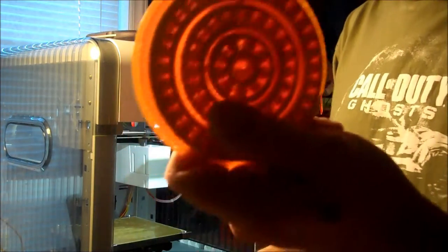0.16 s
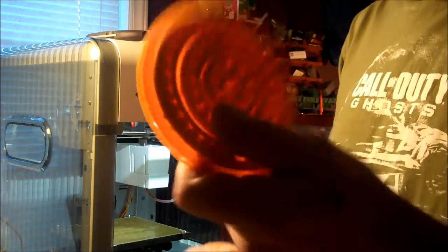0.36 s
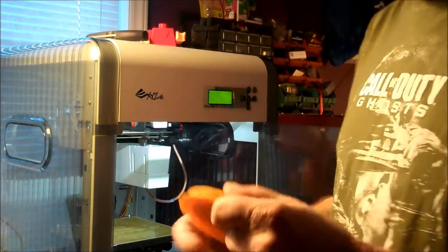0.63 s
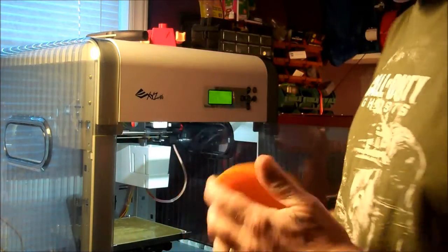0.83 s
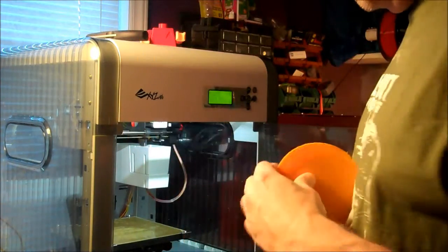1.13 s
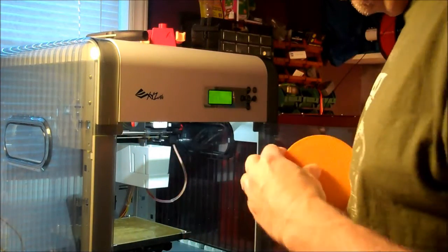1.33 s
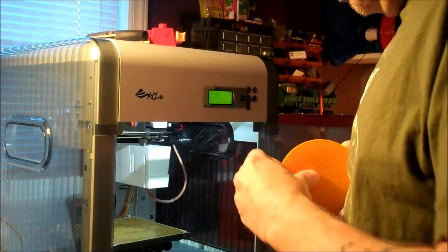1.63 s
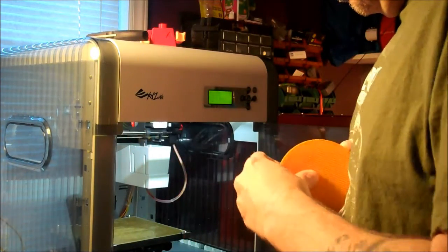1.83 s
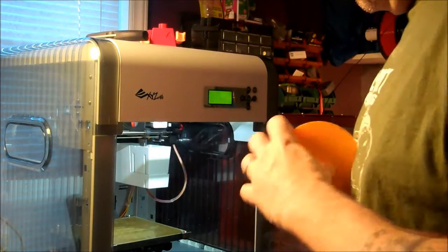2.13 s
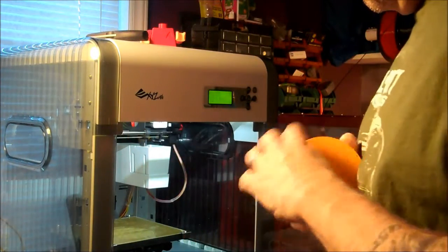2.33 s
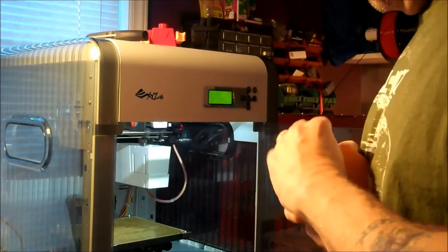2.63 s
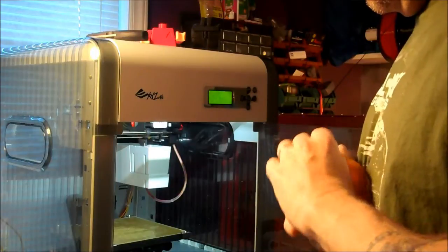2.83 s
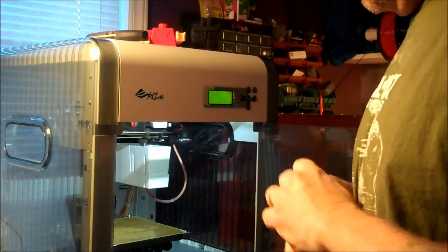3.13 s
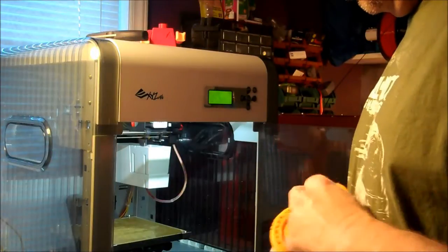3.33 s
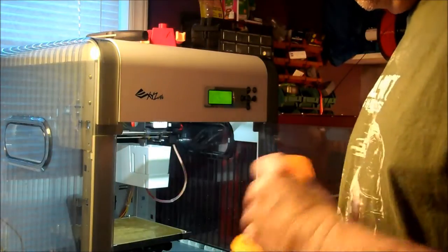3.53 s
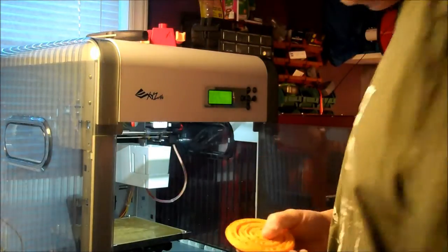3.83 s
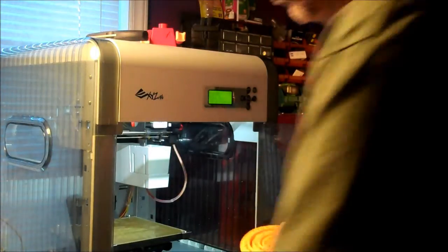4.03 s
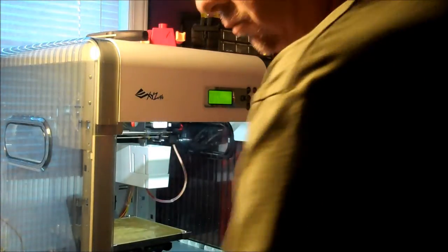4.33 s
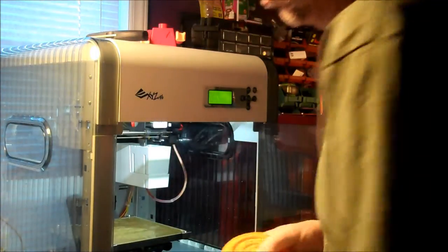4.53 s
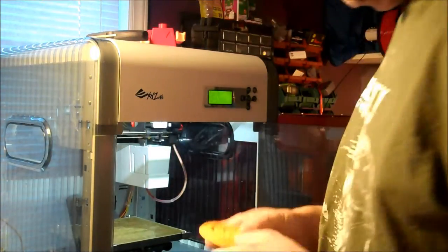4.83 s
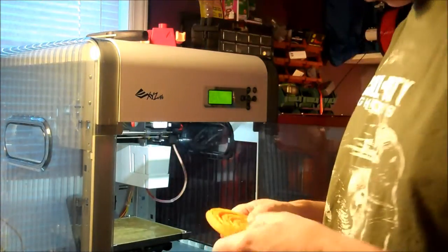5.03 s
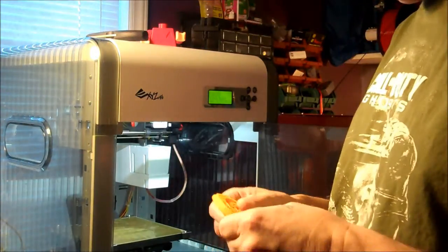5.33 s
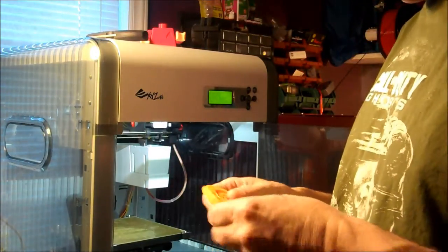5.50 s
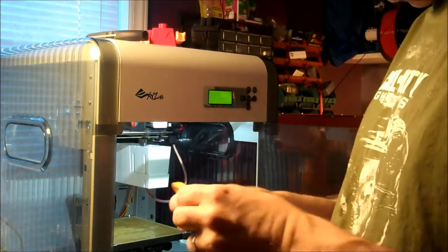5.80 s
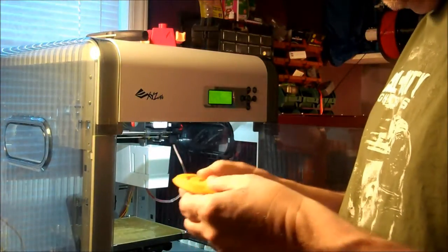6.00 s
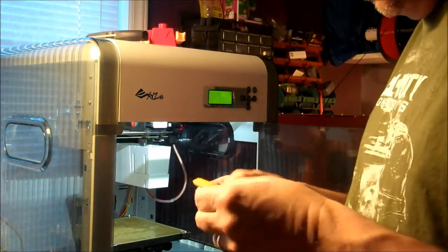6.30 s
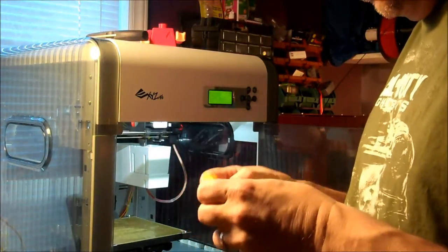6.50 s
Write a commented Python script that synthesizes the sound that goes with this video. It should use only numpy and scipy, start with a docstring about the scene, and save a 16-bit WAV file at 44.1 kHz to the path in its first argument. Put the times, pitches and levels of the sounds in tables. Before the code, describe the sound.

Over a faint machine fan, brittle plastic creaks and breaks with sharp, overloaded cracks, then a small piece clatters away and quiet handling resumes.

```python
"""In a small room, hands bend a hard, ribbed 3D-printed disc until it breaks, and a piece clatters into a bin.
Creaks, three tearing fractures and sharp cracks are clusters of random slips, heard directly and through
the disc's resonances; fingers rub and scrape, and low thumps are decaying low-passed noise.
A printer's fan sums unsteady sines over coloured noise. Bench and printer throw the handwork back as echoes,
scatter and a tail follow, and the loudest sounds overload the camera's microphones."""
import sys
import numpy as np
from scipy import signal
from scipy.fft import rfft, irfft, next_fast_len
from scipy.io import wavfile
from scipy.ndimage import map_coordinates

SR = 44100
rng = np.random.default_rng(int(sys.argv[2]) if len(sys.argv) > 2 else 0)


def output_pcm(signal):
    """Save a mono or channel-first signal as 16-bit PCM at the path in sys.argv[1].

    Samples are clipped to [-1, 1] before scaling.
    """
    pcm = np.clip(np.atleast_2d(signal).T, -1, 1) * 32767
    wavfile.write(sys.argv[1], SR, np.round(pcm).astype(np.int16))


N = 293692

# resonances of the plastic disc: centre [f/Hz], bandwidth [f/Hz], relative gain [level/dB]
DISC_MODES = [(536, 38, -8), (762, 140, 3), (1145, 120, 2.5), (1315, 233, 1), (1613, 130, 2.5),
              (1980, 570, 0), (2370, 63, -8.5), (2780, 22, -2), (3050, 130, 3.5), (3197, 160, 2)]


def amp(db):
    """Level: 20 dB is a factor of ten in amplitude."""
    return 10 ** (np.asarray(db) / 20)


def unit(x):
    """Normalisation to an rms value of 1."""
    return x / np.sqrt(np.mean(x ** 2) + 1e-20)


def along(points, hz):
    """Linear interpolation of (f/Hz, value) points over log frequency."""
    f, value = np.transpose(points)
    return np.interp(np.log(hz + 1), np.log(f + 1), value)


def wobble(rate):
    """Slow random modulation: a spline through Gaussian knots, rate of them a second."""
    knots = rng.standard_normal(int(N * rate / SR) + 4)
    return map_coordinates(knots, [np.arange(N) * rate / SR])


def filtered(x, response):
    """Linear filtering: the spectrum is multiplied by a complex frequency response."""
    size = x.shape[-1]
    padded = 2 * next_fast_len(size // 2 + 4096)
    spectrum = rfft(x, padded) * response(np.fft.rfftfreq(padded, 1 / SR))
    return irfft(spectrum, padded)[..., :size]


def colour(points):
    """Minimum phase: folding the cepstrum makes the gains of (f/Hz, level/dB) points causal."""
    def response(hz):
        cepstrum = irfft(np.log(amp(along(points, hz))))
        cepstrum[1:len(hz) - 1] *= 2
        cepstrum[len(hz):] = 0
        return np.exp(rfft(cepstrum))
    return response


def body(modes):
    """Modal superposition: damped resonators of alternating sign add up."""
    def response(f):
        total = 0
        for k, (centre, width, db) in enumerate(modes):
            damping = 1j * f * width
            total = total + (-1) ** k * amp(db) * damping / (centre ** 2 - f ** 2 + damping)
        return total
    return response


def grains(size, spread_db):
    """Stick-slip: tiny slips of very unequal strength, rms 1."""
    strength_db = spread_db * rng.standard_normal(size // 16 + 1)
    strength = np.repeat(amp(strength_db), 16)[:size]  # one strength for 16 samples
    return unit(rng.standard_normal(size) * strength)


def diffuse(size):
    """Partial coherence: stereo noise most alike near 700 Hz, less so below, nearly unrelated in the treble."""
    # likeness of left and right: f/Hz, correlation [0 to 1]
    likeness = [(60, .4), (200, 0.55), (700, 0.71), (1400, 0.57), (3000, 0.3), (7000, 0.22), (14000, 0.055)]

    def mid_side(hz):
        turn = np.arccos(np.clip(along(likeness, hz), -1, 1)) / 2
        return np.array([np.cos(turn), np.sin(turn)])
    mid, side = filtered(rng.standard_normal((2, size)), mid_side)
    return np.array([mid + side, mid - side])


def add(track, s, sound):
    """Superposition: mix a sound into the track from time s."""
    part = track[..., max(round(s * SR), 0):][..., :sound.shape[-1]]
    part += sound[..., :part.shape[-1]]


def room(x, near_db, far_db, near_t60=0.12):
    """Room impulse response: direct sound, bench and printer echoes, shelf scatter and reverberant tail."""
    # reverberation: f/Hz, decay by 60 dB [t/s]
    reverberation = [(150, 0.14), (500, 0.47), (1400, 0.71), (3000, 0.56), (6500, 0.54), (9000, 0.44),
                     (13000, 0.39)]
    # reflections off bench and printer: delay [t/s], left gain [factor], right gain [factor]
    reflections = [(.0022, 0.16, .12), (.0058, 0.46, 0.14), (0.0121, .14, .08)]
    size = SR // 2
    t = np.arange(size) / SR
    # the tail decays at its own rate in each frequency band
    hz, frame_t, bands = signal.stft(diffuse(size), SR, nperseg=256)
    decay = amp(-60 * frame_t / along(reverberation, hz)[:, None])
    tail = signal.istft(bands * decay, SR, nperseg=256)[1][:, :size]
    tail = unit(tail * (1 - np.exp(-t / .008)))
    scatter = unit(diffuse(size) * amp(-60 * t / near_t60) * (1 - np.exp(-t / 0.00043)))
    paths = (amp(near_db) * scatter + amp(far_db) * tail) / np.sqrt(size)
    paths[:, 0] += 1  # direct sound
    for delay, left, right in reflections:
        add(paths, delay, np.array([[left], [right]]))
    return signal.fftconvolve(x[None], paths, axes=1)


def burst(envelope, spectrum, modes, ring_db, centre_hz, spread_db, lead=0, breadth=0.98,
          ring_db_per_octave=25):
    """Excitation and resonance: slips, optionally led by a clean snap, heard directly and through modes."""
    slips = envelope * grains(len(envelope), spread_db)
    slips[0] = lead * np.linalg.norm(slips)
    # the stronger the ring, the lower the modes that answer most; at 0 dB they centre on centre_hz
    ring_hz = centre_hz * 2 ** (-ring_db / ring_db_per_octave)
    emphasis = body([(ring_hz, breadth * ring_hz, 0)])
    resonance = body(modes)
    ring = filtered(slips, lambda hz: resonance(hz) * emphasis(hz))
    direct = filtered(slips, colour(spectrum))
    sound = unit(direct) + amp(ring_db) * unit(ring)
    return sound * np.sqrt(np.mean(envelope ** 2))


def blows(rows, spectrum, modes, centre_hz, t60, spread_db, lead, near_db, far_db):
    """Impulsive excitation: each row starts at once, decays and has its own random scatter and tail."""
    out, t = np.zeros((2, N)), np.arange(SR // 8) / SR
    envelope = amp(-60 * t / t60)
    for s, db, ring_db in rows:
        sound = burst(envelope, spectrum, modes, ring_db, centre_hz, spread_db, lead)
        add(out, s, amp(db) * room(sound, near_db, far_db))
    return out


def swell(t, length, skew):
    """Sliding speed: a stroke rises and falls as a warped half sine; skew under 1 peaks before its middle."""
    return np.abs(np.sin(np.pi * np.clip(t / length, 0, 1) ** skew))


def strokes(rows, spectrum, centre_hz, skew, spread_db):
    """Sliding friction: each row is a short slide that swells and fades."""
    out, t = np.zeros(N), np.arange(SR // 6) / SR
    for s, length, db, ring_db in rows:
        envelope = swell(t, length, skew)
        add(out, s, amp(db) * burst(envelope, spectrum, DISC_MODES, ring_db, centre_hz, spread_db))
    return out


def printer_fan(drift=0.001033, flutter_db=1.5, air_db=-57.5):
    """Tonal and broadband fan noise: slightly unsteady sines over the rush of air."""
    # partials of the whine: f/Hz, rms level/dB before flutter
    partials = [(387.6, -73.5), (737.5, -74.5), (1480, -73.5), (1556, -74.5), (1712, -67), (1793, -66),
                (2649, -79), (3268, -74), (3348, -82), (3505, -80.5), (3973, -77.5)]
    # spectrum of the air rush: f/Hz, relative level/dB
    air_spectrum = [(15, -46.5), (25, -22), (126, -8.5), (231, -10), (293, -8), (353, -10.5), (382, -11),
                    (425, -7), (722, -7), (1400, -12), (1730, -8.5), (2380, -12.5), (3180, -13),
                    (4250, -14.5), (14000, -20.5)]
    running_time = np.cumsum(1 + drift * wobble(9.9)) / SR  # shared by all partials
    whine = 0
    for hz, db in partials:
        level = np.sqrt(2) * amp(db + flutter_db * wobble(13.0))
        phase = rng.normal(0, 0.23, (2, 1))  # left and right [rad]
        whine = whine + level * np.sin(2 * np.pi * hz * running_time + phase)
    return whine + amp(air_db) * unit(filtered(diffuse(N), colour(air_spectrum)))


def rubbing(unsteady_db=2.0, grip_db=-70.5, grip_ring_db=-16.5, grip_swing_db=2.5):
    """Friction: skin drags on the ridges, faintly throughout and in slow strokes, and rings the disc."""
    # slow finger slides: start [t/s], length [t/s], hiss [level/dB] ahead of the room,
    # disc ring re hiss [level/dB]; a firmer grip rings more
    slides = [(0, 0.066, -58.5, -18), (.37, 0.088, -68, -18), (0.71, 0.29, -56, -13),
              (0.933, 0.13, -57, -4.5), (1.144, 0.18, -53, -6.5), (1.261, 0.05, -54.5, -22),
              (1.357, 0.078, -57, -6), (1.529, 0.097, -62.5, -12), (1.962, 0.17, -38.5, -14),
              (2.149, 0.17, -45, -9.5), (2.332, .14, -54, -10), (3.338, 0.11, -54, 6),
              (3.524, 0.16, -52.5, -2.5), (3.647, 0.7, -64, -2.5), (4.676, 0.14, -59.5, -17),
              (4.818, 0.15, -56.5, -6.5), (4.97, 0.19, -61.5, -20), (5.163, 0.17, -54, -21),
              (5.377, 0.17, -59.5, -17), (5.522, .12, -52, -20), (5.7, 0.33, -61, -8),
              (6.244, 0.24, -68.5, -6)]
    # spectrum of skin on ridges: f/Hz, relative level/dB
    skin_spectrum = [(300, -30.5), (1500, -10.5), (3500, -3), (6000, 2), (7500, 2.5), (10000, -8),
                     (13500, -15.5)]
    t = np.arange(N) / SR
    slips = grains(N, spread_db=6.0) * amp(unsteady_db * wobble(60))
    hiss = unit(filtered(slips, colour(skin_spectrum)))
    ring = unit(filtered(slips, body(DISC_MODES)))
    # the holding hand never keeps quite still
    out = amp(grip_db + grip_swing_db * wobble(12)) * (hiss + amp(grip_ring_db) * ring)
    for s, length, db, ring_db in slides:
        stroke = swell(t[:round(length * SR)], length, skew=0.82)
        start = max(round(s * SR), 0)
        part = slice(start, start + len(stroke))
        sound = hiss[part] + amp(ring_db) * ring[part]
        add(out, s, amp(db) * stroke[:len(sound)] * sound)
    return room(out, near_db=0.5, far_db=-4)[:, :N]


def breaking():
    """Brittle fracture: bursts tear through the disc; single layers give way or edges click in between."""
    # tearing bursts: t/s, envelope peak level/dB ahead of ring and room, disc ring re slips [level/dB]
    fracture_rows = [(1.6027, 2, -4.5), (1.6085, 12, -17), (1.613, 2, -13), (1.616, 2.5, -17),
                     (1.631, 4, -12.5), (1.6338, 4, -18.5), (1.6862, 1.5, -6.5), (2.558, 7.5, -3),
                     (2.561, 9, -7), (2.5768, 5, -5), (2.5804, -10, -10.5), (3.1362, 7, -9),
                     (3.1385, 6.5, -9.5), (3.1435, 1.5, -3), (3.1518, 5, -8), (3.1603, 1, -10.5)]
    # snapping layers and clicking edges: the same columns, t/s, level/dB, ring [level/dB]
    crack_rows = [(.0738, -38, -26), (.1272, -40.5, -26), (.6035, -53, -22), (.9658, -31, -20),
                  (.9825, -28.5, -8.5), (1.2901, -29.5, -23), (1.5962, -19.5, -12), (1.6445, -8.5, -17),
                  (1.648, -4, -24), (1.658, -6, -10), (1.6842, -36, -1), (2.2105, -33.5, -16.5),
                  (2.2475, -45, -8.5), (2.2545, -21.5, -13.5), (2.5953, -6, -17), (2.676, -2, -9),
                  (2.7476, .5, -25.5), (2.7783, -4, -31.5), (2.7994, -11.5, -14.5), (2.8825, -24, -5),
                  (2.9742, -.5, -17.5), (3.0326, 1, -28), (3.11, -2.5, -22), (3.1245, -15.5, -16.5),
                  (3.167, -3, -4), (3.2185, -18, 5.5)]
    # spectrum of a snap: f/Hz, relative level/dB
    snap_spectrum = [(100, -26.5), (500, -14.5), (1200, -12), (2500, 2), (3600, -1), (4800, 7), (6200, 4.5),
                     (7800, 7.5), (10000, -4.5), (13500, -11.5)]
    ring_hz = 1431  # where a ring as loud as its slips centres
    fractures = blows(fracture_rows, snap_spectrum, DISC_MODES, ring_hz, t60=0.007,
                      spread_db=7.0, lead=0.34, near_db=-5.5, far_db=-17.5)
    cracks = blows(crack_rows, snap_spectrum, DISC_MODES, ring_hz, t60=0.0037,
                   spread_db=5.5, lead=0.79, near_db=1.5, far_db=-9.5)
    return fractures + cracks


def scrapes():
    """Stick-slip friction: strained layers creak and grind; fingertips brush the ribs, lighter and airier."""
    # creaks of the bent disc: start [t/s], length [t/s], envelope peak [level/dB] ahead of ring and room,
    # disc ring re slips [level/dB]
    creak_rows = [(1.992, 0.06, -44, 1), (2.036, 0.03, -35, -2.5), (2.198, .026, -34, -8.5),
                  (2.241, 0.033, -34.5, 0.5), (2.526, .028, -41, 0.5), (3.121, 0.05, -25, -11.5)]
    # quick finger brushes across the ribs: t/s, length [t/s], level/dB, ring [level/dB], as for creaks
    brush_rows = [(.600, 0.06, -45.5, -27), (.645, 0.056, -49.5, -18), (.692, 0.068, -50.5, -13),
                  (.781, 0.038, -46.5, -30), (.850, 0.03, -45.5, -7.5), (.950, .048, -46, -14),
                  (1.116, 0.047, -49.5, -5.5), (1.350, 0.037, -49.5, -5.5), (3.472, 0.077, -46.5, -9),
                  (5.800, 0.038, -45, -23), (6.212, 0.052, -51.5, -8.5)]
    # spectrum of grinding layers: f/Hz, relative level/dB
    grind_spectrum = [(300, -27), (1500, -10), (3500, -15), (5000, -9), (6500, 1.5), (7800, -6.5),
                      (10000, -13), (13500, -28.5)]
    # spectrum of a fingertip: f/Hz, relative level/dB
    fingertip_spectrum = [(300, -18), (1500, -12.5), (3500, -4.5), (6000, 3.5), (7500, 7), (10000, -4),
                          (13500, -9)]
    creaks = strokes(creak_rows, grind_spectrum, centre_hz=1684, skew=0.49, spread_db=3.5)
    brushes = strokes(brush_rows, fingertip_spectrum, centre_hz=1100, skew=0.37, spread_db=2.5)
    return room(creaks + brushes, near_db=-2, far_db=-11.0)[:, :N]


def thumps(corner_hz=75, t60=0.027, right_db=-14):
    """Decaying low-passed noise: low thumps, mostly on the left, during the loudest breaks."""
    # low thumps: t/s, envelope peak level/dB ahead of the port gains
    thump_rows = [(1.605, -4.5), (1.609, -16), (3.138, -17)]
    out, t = np.zeros((2, N)), np.arange(SR // 10) / SR
    envelope = amp(-60 * t / t60)
    lowpass = signal.butter(2, corner_hz, fs=SR, output="sos")
    for s, db in thump_rows:
        for port in out:  # independent noise on each
            thump = signal.sosfilt(lowpass, envelope * rng.standard_normal(len(t)))
            add(port, s, amp(db) * unit(thump) * np.sqrt(np.mean(envelope ** 2)))
    return out * amp([[0], [right_db]])


def dropped_piece():
    """Impact on a hollow body: a shard lands, skitters and settles in a bin, further off."""
    # landings: t/s, envelope peak level/dB ahead of ring and room, bin boom re slips [level/dB]
    landings = [(4.344, -19, -42), (4.359, -16.5, -12.5), (4.386, -17.5, -10.5), (4.402, -16.5, -20),
                (4.418, -24.5, -7), (4.428, -22.5, -0.5), (4.442, -23, -23), (4.461, -27, -6),
                (4.484, -39.5, 1), (4.519, -27.5, -1.5), (4.534, -32.5, -6), (4.551, -40, -8)]
    # spectrum of the rattle: f/Hz, relative level/dB
    rattle_spectrum = [(100, -34), (200, -31), (400, -14.5), (1200, -1), (2500, 1.5), (4500, 3.5),
                       (7500, 2), (10000, -7), (13500, -13)]
    # resonances of the bin: centre [f/Hz], bandwidth [f/Hz], relative gain [level/dB]
    bin_modes = [(220, 61, -5.5), (351, 61, 4), (405, 40, 4.5), (493, 210, -3), (774, 50, 3.5),
                 (840, 210, -4), (1380, 120, -31)]
    return blows(landings, rattle_spectrum, bin_modes, centre_hz=315, t60=.045,
                 spread_db=7.5, lead=0.14, near_db=0.5, far_db=-6.5)


def scene(left_lag=.000016):
    """Arrival-time difference: handwork a little to the right reaches two resonant ports; the fan is added."""
    # response of the left port: f/Hz, gain [level/dB]
    left_port = [(3000, -3.5), (5500, -3.5), (6800, 2.5), (7900, 4.5), (9500, 1), (13000, 0.5)]
    # response of the right port: f/Hz, gain [level/dB]
    right_port = [(3000, -2.5), (5000, -1.5), (6300, 5.5), (7900, -6.5), (9500, -11.5), (13000, -7.5)]
    fan = printer_fan()
    left, right = rubbing() + breaking() + scrapes() + thumps() + dropped_piece()
    left = filtered(left, lambda hz: colour(left_port)(hz) * np.exp(-2j * np.pi * hz * left_lag))
    right = filtered(right, colour(right_port))
    return np.array([left, right]) + fan


def record(dry, ceiling=0.86, edge_hz=14100, duck_db=3, release=0.12, top_hz=15342):
    """Saturation: the top treble is cut off steeply; overload ducks the level and rounds off the loudest peaks."""
    lowpass = signal.ellip(8, .1, 70, edge_hz, fs=SR, output="sos")
    x = signal.sosfilt(lowpass, dry)
    # every overloaded sample charges the gain control, which then slowly lets go (release in s)
    overload = np.abs(x).max(axis=0) > ceiling
    charge = signal.lfilter([1], [1, -np.exp(-1 / (release * SR))], overload)
    x = x * amp(-duck_db * np.tanh(charge / 250))
    clipped = x / (1 + np.abs(x / ceiling) ** 6) ** (1 / 6)
    # the treble that the rounding adds is cut off too
    return filtered(clipped, lambda hz: 1 / (1 + (hz / top_hz) ** 100))


dry = scene()
out = record(dry)
output_pcm(out)
```